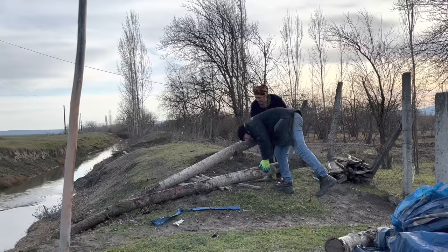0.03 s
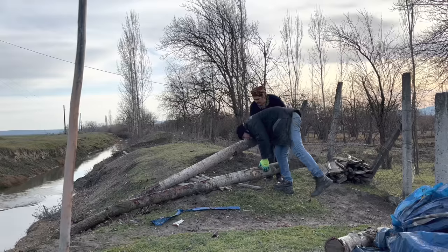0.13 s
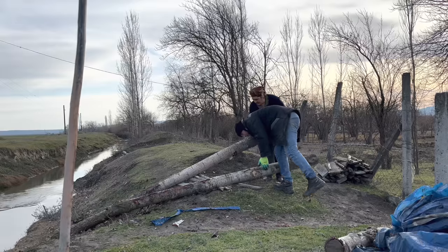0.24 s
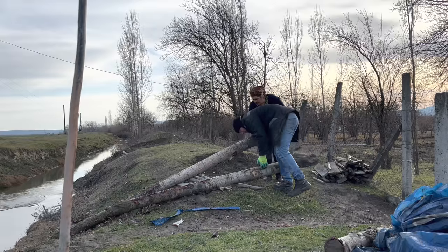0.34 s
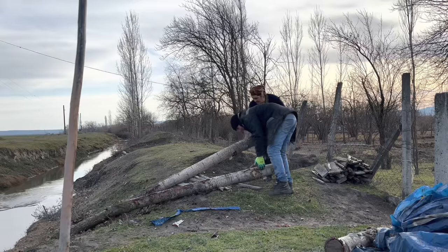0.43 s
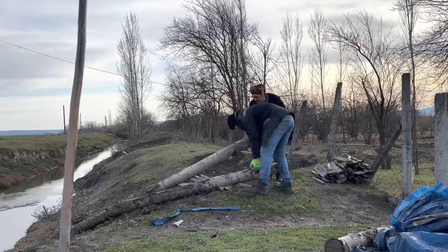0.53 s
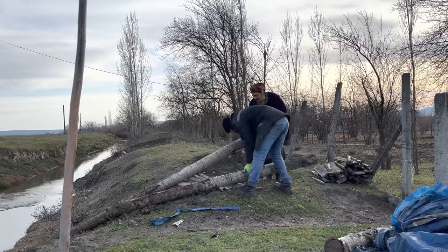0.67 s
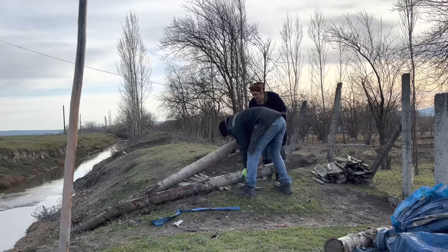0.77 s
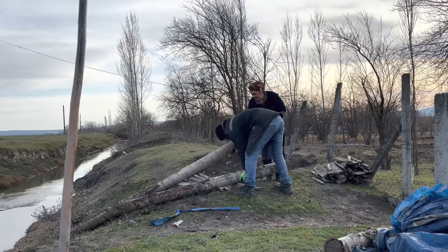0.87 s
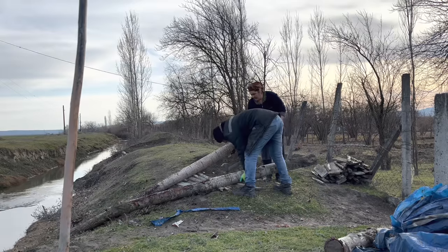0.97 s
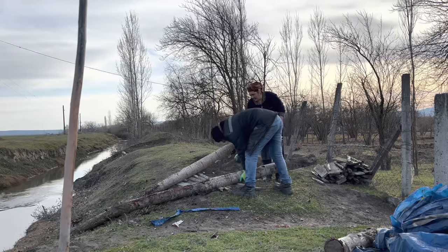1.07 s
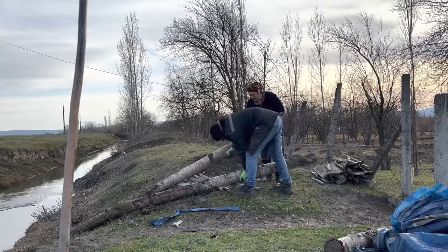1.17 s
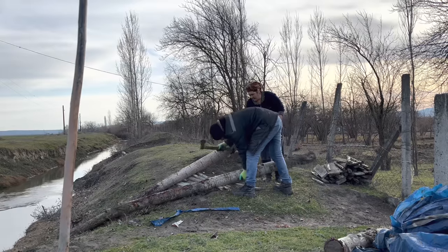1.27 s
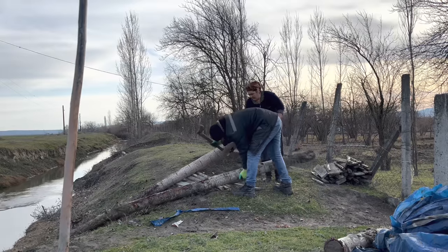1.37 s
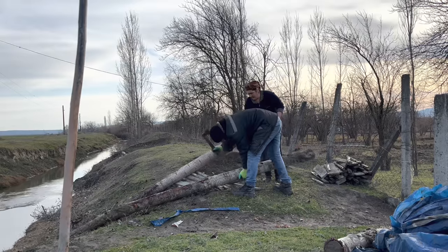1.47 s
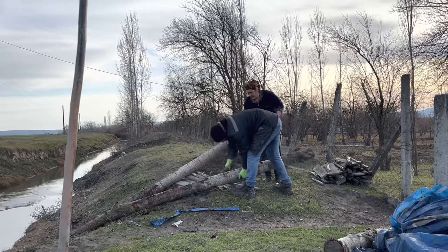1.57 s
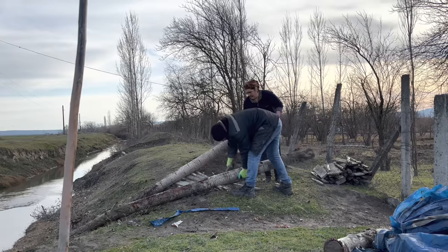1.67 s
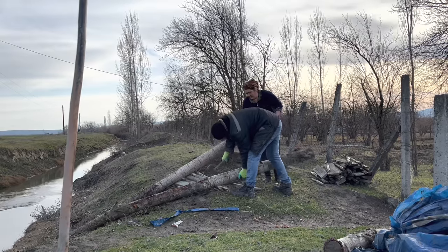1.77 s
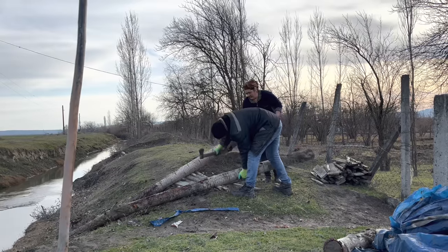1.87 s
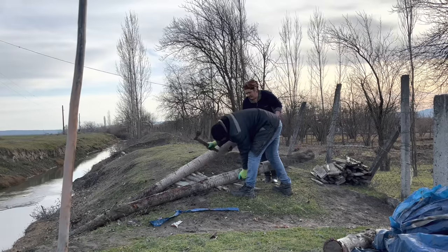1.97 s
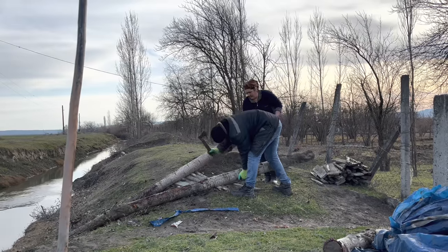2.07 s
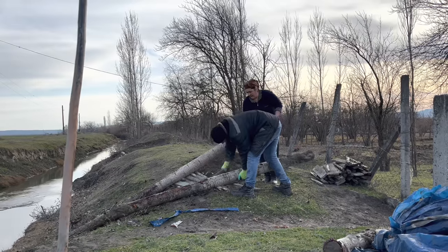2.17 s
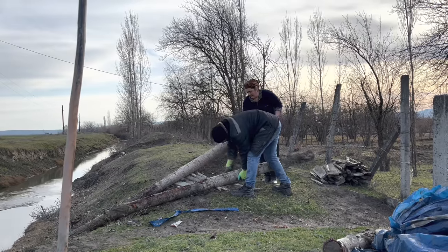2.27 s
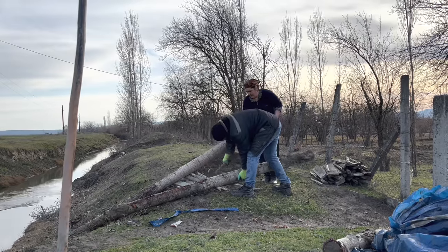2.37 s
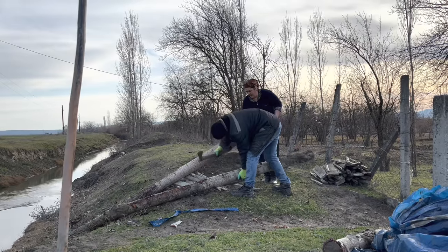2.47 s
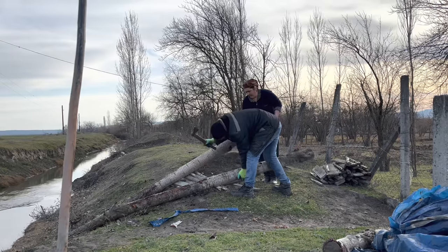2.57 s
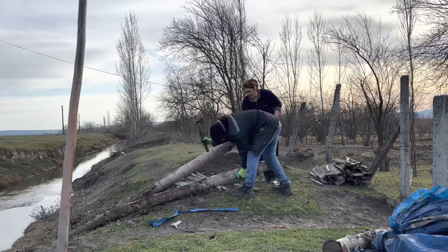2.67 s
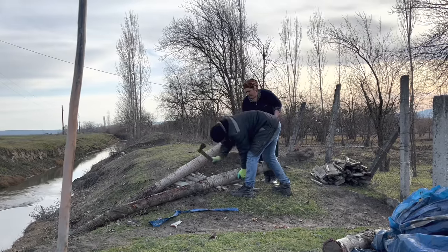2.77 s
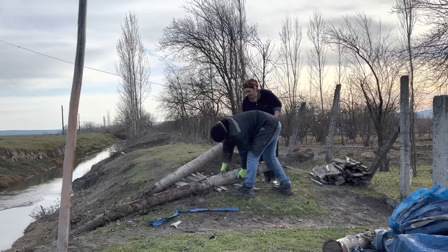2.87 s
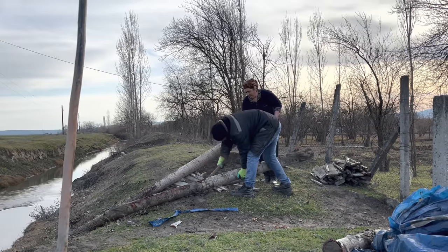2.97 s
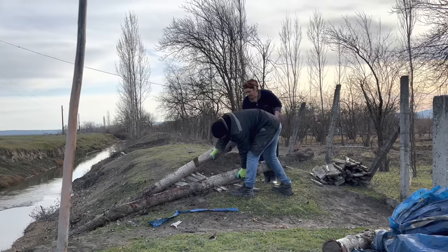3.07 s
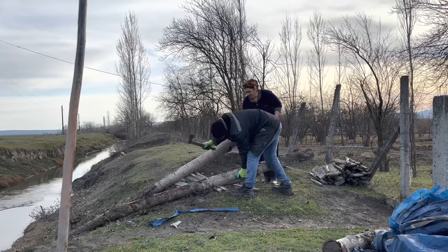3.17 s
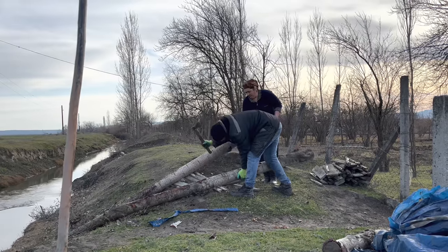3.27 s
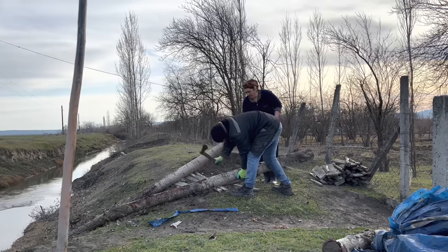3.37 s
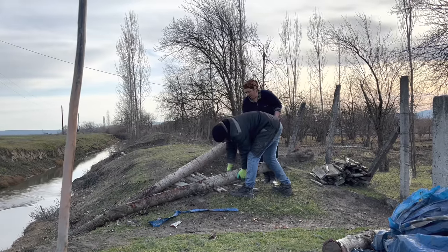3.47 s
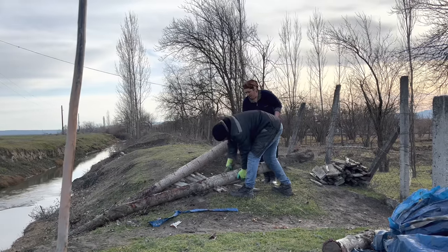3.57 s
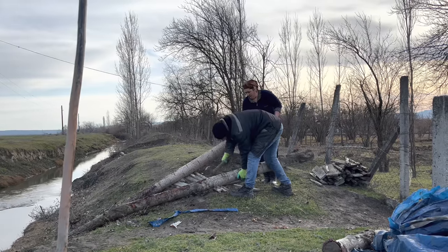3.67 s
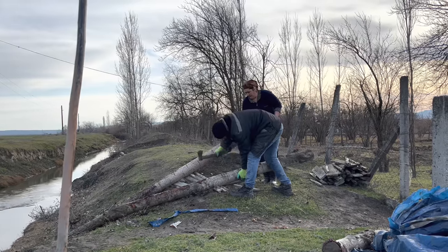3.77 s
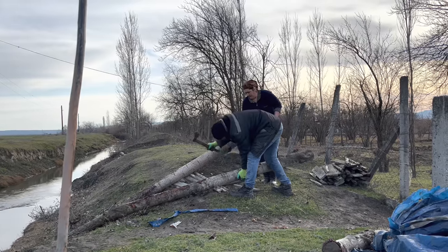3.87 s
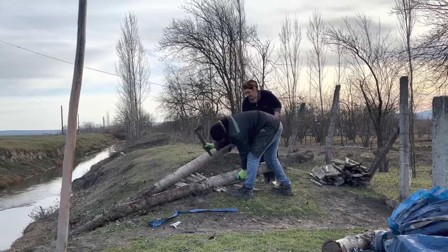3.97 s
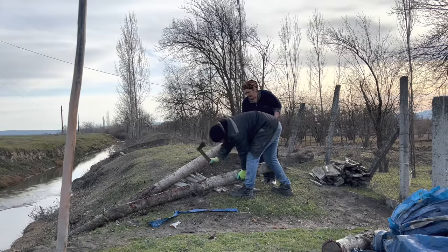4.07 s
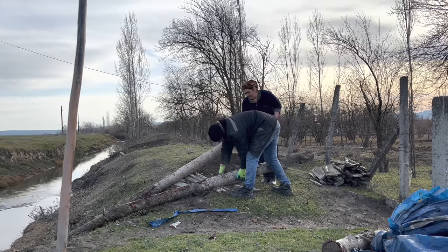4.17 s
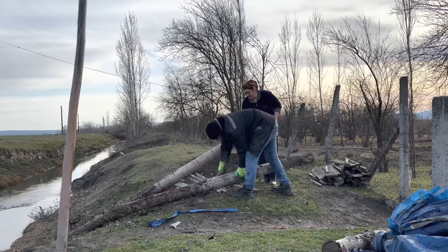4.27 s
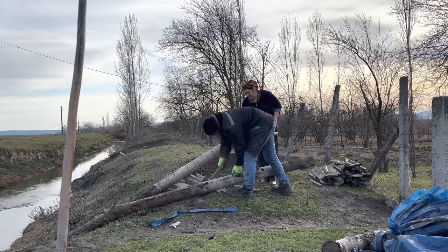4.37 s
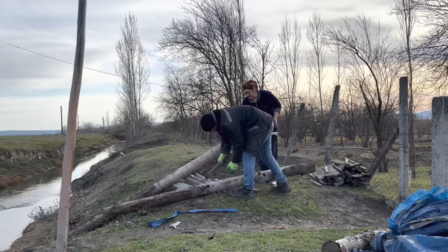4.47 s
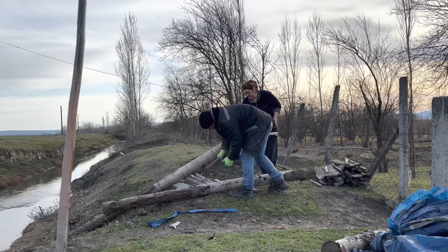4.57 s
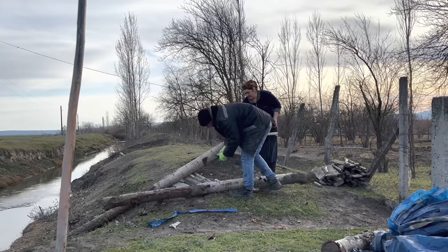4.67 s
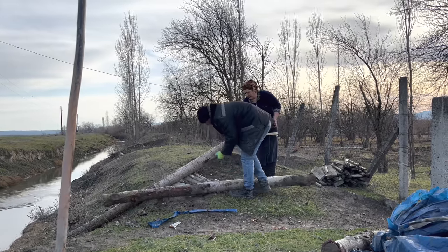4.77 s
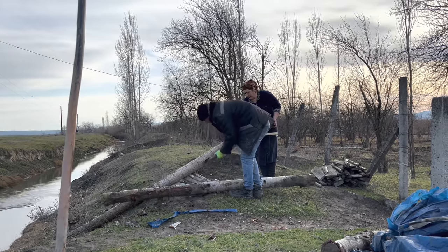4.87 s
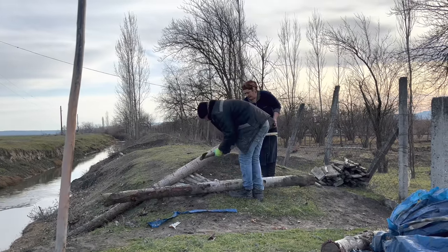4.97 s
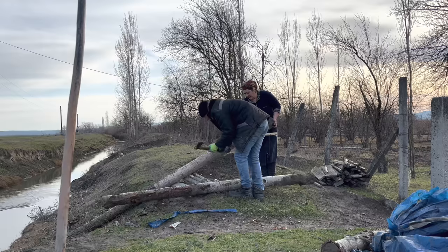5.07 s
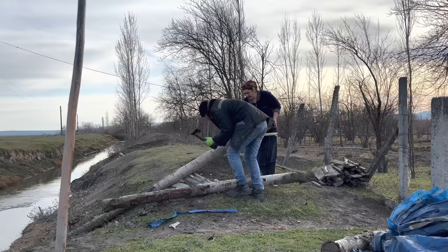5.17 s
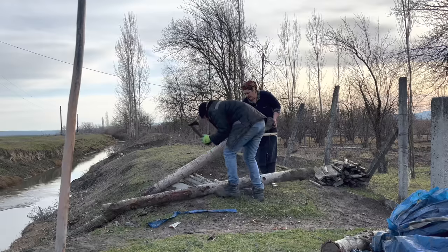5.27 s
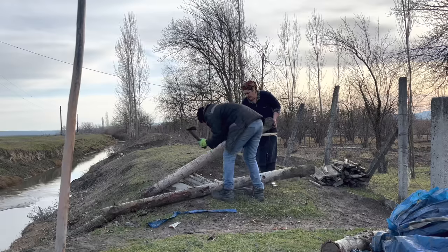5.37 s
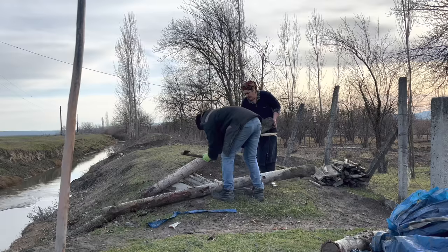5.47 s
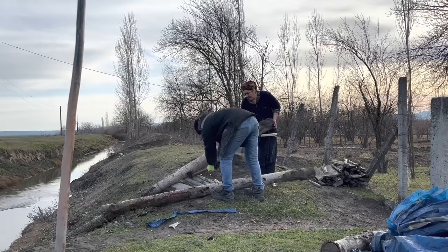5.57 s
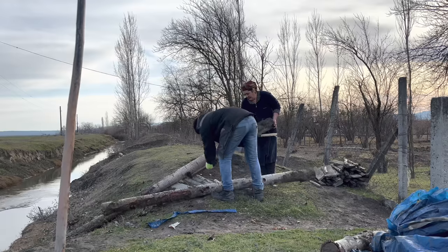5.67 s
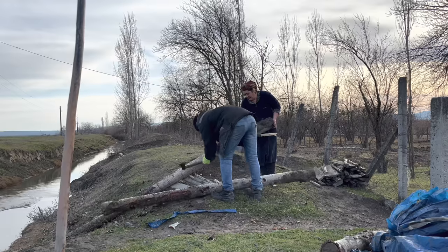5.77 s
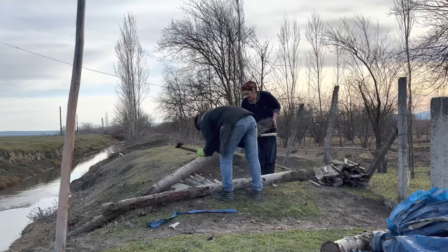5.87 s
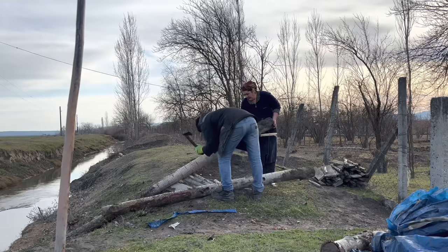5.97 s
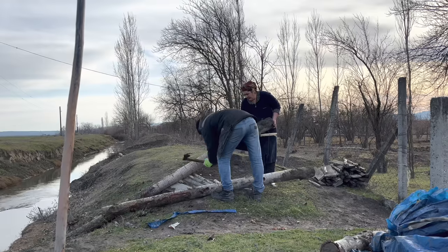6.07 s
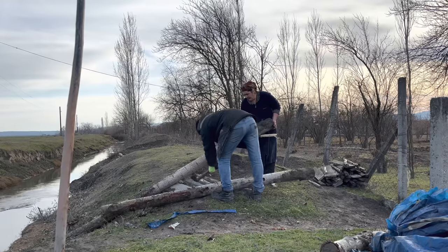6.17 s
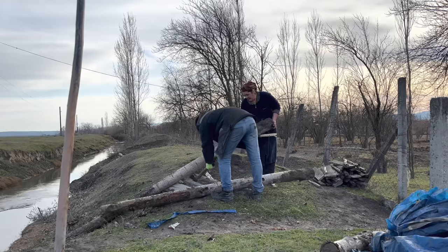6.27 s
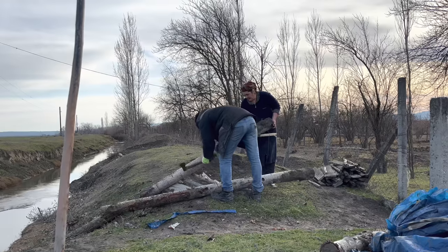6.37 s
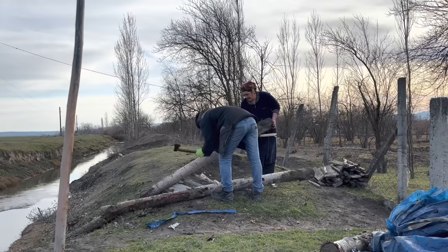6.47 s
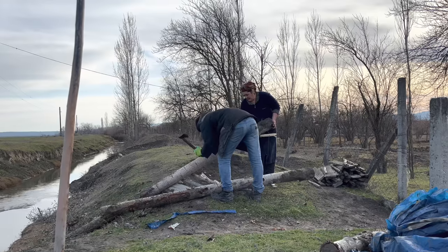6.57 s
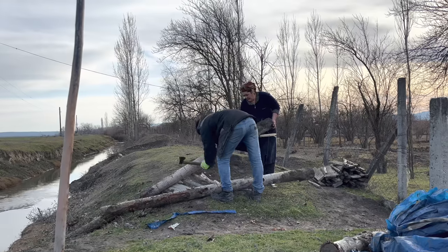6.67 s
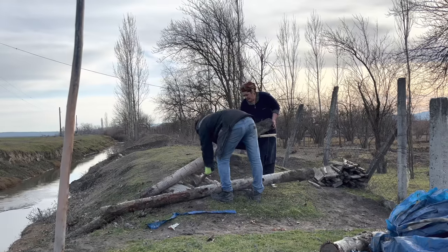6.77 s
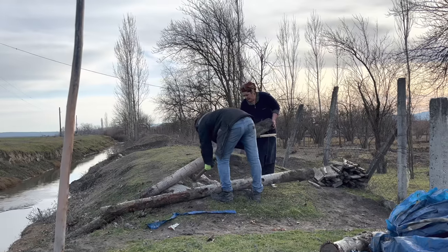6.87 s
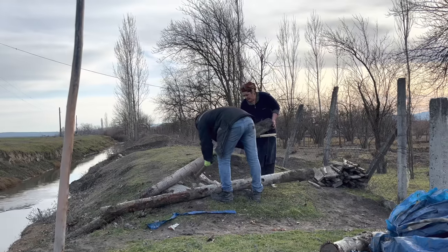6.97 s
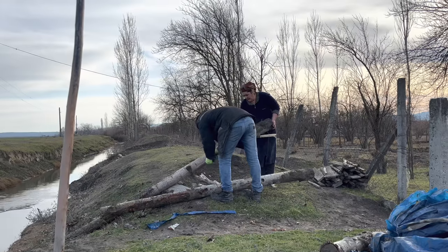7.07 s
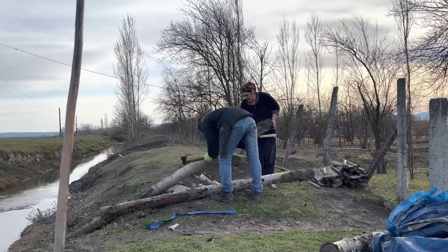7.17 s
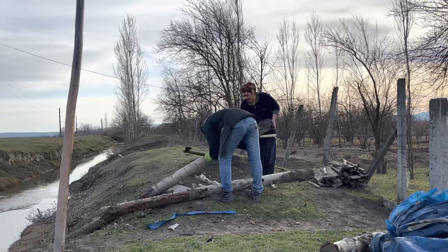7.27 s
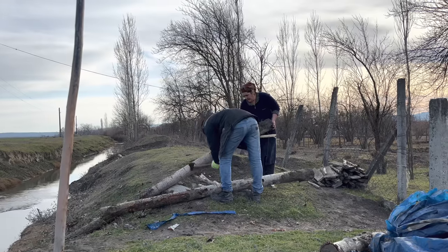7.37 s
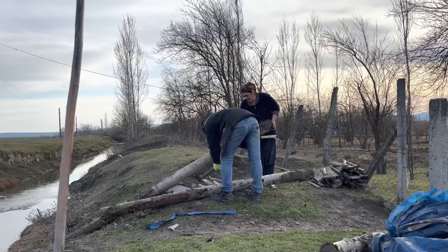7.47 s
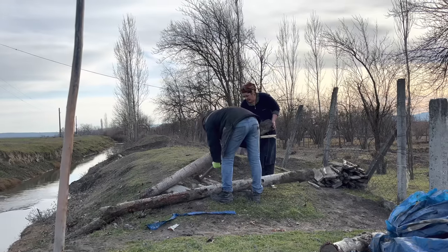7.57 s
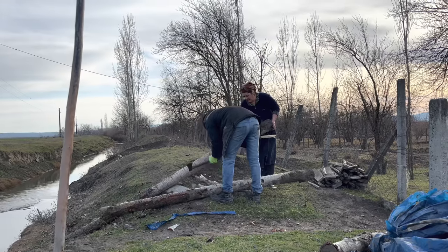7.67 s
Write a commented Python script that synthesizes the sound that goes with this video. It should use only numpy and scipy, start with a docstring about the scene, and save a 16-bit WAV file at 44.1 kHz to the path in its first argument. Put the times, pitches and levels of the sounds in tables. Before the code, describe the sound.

Outdoors on an open bank, soft rustling of boots and bark in dry grass leads into nine axe blows on a fallen trunk a few metres away. Each is a short fibrous crack with a dull, damped wooden knock and a faint diffuse tail from bare trees. After five hits comes a longer pause, filled by rustling and a low wind gust thumping the microphone, then four more hits.

```python
"""On an open river bank, boots and bark rustle in dry grass near the microphone as wind passes it.
From 1.6 s on, nine axe blows cut into a fallen trunk a few metres away: each is a burst of breaking fibres,
then four damped wood resonances. The handle rings, chips tick, and bare trees return a diffuse tail.
Midway a long gust rumbles and flutters as shaped noise, and eddies thump the microphone as short low swings.
The blows carry on to the last at 7.4 s, over more rustling and the faint hush of the field."""
import sys
import numpy as np
from scipy import signal
from scipy.fft import rfft, irfft, next_fast_len
from scipy.io import wavfile
from scipy.ndimage import uniform_filter1d

SR = 44100
rng = np.random.default_rng(int(sys.argv[2]) if len(sys.argv) > 2 else 0)


def digitize_waveform(pressure):
    """Quantize a signal to 16-bit integers and store it at the path in sys.argv[1].

    Rows of a 2-D input are taken as channels; values are limited to [-1, 1].
    """
    field = np.atleast_2d(pressure).T
    bounded = np.clip(field, -1, 1)
    quanta = np.round(bounded * 32767).astype(np.int16)
    wavfile.write(sys.argv[1], SR, quanta)


N = 340452
TIME = np.arange(N) / SR  # seconds
SHORT = TIME[:SR // 3]  # time axis of one contact

# Axe blows on the trunk. Each row: start in seconds, then thud, knock, clack and snap resonances, each as
# frequency in Hz and gain in dB, then fibre crack gain in dB, gain of the diffuse tail in dB.
BLOWS = [(1.5706, 296, 33.5, 647, 31.5, 1250, 13, 1910, 15, -1.5, -5),
         (2.172, 286, 38.5, 494, 29.5, 1000, 24, 1670, 20, -4, -8),
         (2.8167, 298, 33, 640, 31.5, 1028, 25, 2056, 19, 4, -4.5),
         (3.4177, 292, 34, 617, 32.5, 1070, 28.5, 2217, 25.5, 0, -3.5),
         (4.1365, 310, 34.5, 688, 35.5, 1186, 30, 1984, 21.5, -3, -1.5),
         (5.5212, 334.5, 34.5, 567, 30, 838, 32.5, 1790, 25, 1.5, -2.5),
         (6.1040, 336, 34, 573, 32, 1104, 28, 1908, 25.5, 2, 1),
         (6.7010, 413, 34.5, 860, 30, 1340, 19, 1950, 23.5, 1.5, 0.5),
         (7.3882, 376, 32.5, 528, 28.5, 1080, 20.5, 1760, 21.5, -1, -5.5)]
# Rebounds of the blade, flying chips and cracking bark; all get a common boost in chips().
# Each row: start in seconds, relative level in dB of body, of clack, of tick.
CHIPS = [(1.592, -22.5, -26.5, -51), (1.702, -64, -65, -67), (2.005, -68, -79, -55.5),
         (2.244, -42, -63, -65), (3.44, -45, -45, -45), (3.471, -45, -46, -54.5), (3.503, -43, -57, -71),
         (4.389, -64, -54, -70), (4.445, -56, -58, -70), (4.691, -70, -56.5, -63.5), (4.777, -73, -80, -56),
         (6.755, -24, -35.5, -76), (6.860, -62, -50.5, -46.5), (6.890, -40.5, -57, -60),
         (7.46, -30.5, -42, -54), (7.511, -43.5, -57, -76.5)]
# Off-centre hits and wrenching the blade free. Each row: start in seconds, level in dB.
HANDLE_JOLTS = [(1.594, -28), (1.702, -36), (2.245, -43), (3.422, -26), (3.504, -36), (4.14, -17)]
# Bending modes of the wooden handle. Each row: frequency in Hz, relative level in dB, 60 dB decay in seconds.
HANDLE_MODES = [(231, -7, .2), (689, 0, .15), (1265, -16, .07), (1905, -18, .07)]
# Glancing contacts of the steel head. Each row: start in seconds, level in dB.
GLANCES = [(6.859, -48), (6.955, -62), (6.982, -56), (7.392, -41.5)]
# Modes of the steel head. Each row: frequency in Hz, relative level in dB, 60 dB decay in seconds.
STEEL_MODES = [(4050, -1, 0.05), (6260, -6.5, 0.13), (12300, -12, 0.097)]
# Colour of breaking fibres. Each row: frequency in Hz, gain in dB.
FIBRE_COLOUR = [(40, -3), (160, 23.5), (600, 16.5), (1300, 18), (2500, 12.5), (4000, 7.5), (6000, 0.5),
                (9000, -3), (11000, -3), (13500, -6.5), (16000, -13)]
# Scatter from the ground near the trunk. Each row: frequency in Hz, gain in dB, 60 dB decay in seconds.
GROUND_SCATTER = [(104, 2, 0.24), (313, -11.5, .16), (1000, -7, 0.05), (3000, -8.5, 0.067),
                  (12000, -15, 0.025)]
# Colour and decay of the long diffuse tail, with a narrow gap near 8.2 kHz.
# Each row: frequency in Hz, gain in dB, 60 dB decay in seconds.
DIFFUSE_TAIL = [(60, -2.5, 0.31), (262, 7.5, 1), (710, 10.5, 0.19), (2000, -7.5, .6), (3780, -19.5, 0.59),
                (7250, -17, 0.27), (8154, -32, 0.1), (10100, -17.5, 0.29), (13500, -23, 0.24),
                (16000, -42.5, .2)]
# The two microphone ports, as heard from the trunk.
# Each row: frequency in Hz, phase by which left leads right in radians, left minus right level in dB.
PORTS = [(0, 0, 0), (250, 0, 1), (2200, .2, .7), (3300, 1, 2), (4700, .6, 3), (6000, -.8, 1.5),
         (7000, -1.1, .5), (8400, -3.1, 0), (11000, -5.6, 0), (15000, -9, 0)]
# Boots and bark dragged through dry grass.
# Each row: fastest moment in seconds, nominal length in seconds, scrape level in dB, hiss level in dB.
RUSTLES = [(0.02, 0.59, -67.5, -79.5), (0.581, 0.11, -74, -67.5), (.74, 0.33, -66.5, -75.5),
           (1.985, .12, -77, -67), (3.768, .45, -72.5, -90), (4.377, 0.22, -60.5, -73.5),
           (4.566, 0.34, -69, -71.5), (4.775, 0.18, -66, -71), (5.2, 0.25, -70, -70),
           (5.31, 0.075, -72, -64), (5.8, 0.3, -76.5, -82), (6.44, 0.23, -74, -84.5),
           (6.96, 0.098, -68, -69), (7.703, 0.14, -85, -80)]
# Colour of scraped bark. Each row: frequency in Hz, relative gain in dB.
SCRAPE_COLOUR = [(200, -9.5), (700, 1), (1700, -2), (3000, -7), (5000, -15), (9000, -37.5)]
# Colour of the bright rustling hiss, with a narrow gap near 8.4 kHz.
# Each row: frequency in Hz, relative gain in dB.
HISS_COLOUR = [(1000, -21.5), (3000, 1), (4500, 0.5), (7200, 2), (8400, -42), (9800, 3), (13500, -1),
               (16000, -33.5)]
# Single eddies at the microphone; all get a common boost in buffets().
# Each row: start in seconds, relative level in dB, frequency in Hz.
BUFFETS = [(0.033, -32, 86), (0.676, -19, 71), (0.829, -27, 71.4), (0.972, -24.5, 74.6), (2.546, -24, 80.3),
           (2.97, -17, 82), (3.083, -21, 66), (3.535, -14.5, 110.8), (3.714, -19, 94.6), (3.805, -16, 84),
           (4.835, -15.5, 79.5), (4.981, -18, 119), (5.035, -13, 82.5), (5.266, -18.5, 103.4),
           (7.169, -22.5, 77.7), (7.408, -15.5, 72.5), (7.563, -22.5, 105), (7.647, -22, 82.1)]
# Wind at the microphone, one long gust in the middle. Each row: time in seconds, strength in dB.
WIND_STRENGTH = [(0.0, -54.5), (0.52, -61), (0.79, -50), (1.48, -57), (1.74, -49.5), (2.26, -54.5),
                 (3.14, -39), (3.35, -43), (4.34, -31), (4.69, -39), (5.12, -32), (5.27, -41),
                 (5.87, -49.5), (6.21, -48), (6.52, -53.5), (7.12, -49.5), (7.31, -46), (7.72, -40)]
# Colour of the wind rumble. Each row: frequency in Hz, relative gain in dB.
RUMBLE_COLOUR = [(20, -21), (40, -0.5), (60, 6.5), (95, 3), (135, -4), (200, -29.5), (400, -76.5)]
# Colour of the higher wind flutter. Each row: frequency in Hz, relative gain in dB.
FLUTTER_COLOUR = [(70, -17.5), (150, 1.5), (220, -5.5), (320, -19), (600, -43.5), (1500, -66.5)]
# Colour of the open field's hush. Each row: frequency in Hz, relative gain in dB.
AIR_COLOUR = [(100, -6), (300, 1), (500, 5.5), (1000, -6.5), (1600, -14), (3000, -27), (6000, -27.5),
              (8500, -35.5), (11000, -28), (16000, -39)]

# every blow shakes the handle a little, this long after its start
BLOW_JOLT_DB, JOLT_DELAY_S = -32.5, .003
# sleeves swish as the axe comes down before each blow
SWING_LEAD_S, SWING_S, SWING_SCRAPE_DB, SWING_HISS_DB = .05, 0.25, -76.5, -81.5
# a movement swells for this share of its nominal length, and is this much fainter at both its ends
RISE_SHARE, ENDS_DB, ROUNDNESS = .42, -13, 1.2
RUMBLE_DB = 3.5  # rumble above the wind's strength
# at a moderate breeze's strength the flutter has this level, and it grows with the wind
BREEZE_DB, FLUTTER_DB, FLUTTER_DB_PER_DB = -45, -52.5, 0.99
AIR_DB = -64
# the microphone has a narrow dip in the middle range, and an upper band limit
DIP_HZ, DIP_WIDTH_HZ, DIP_DEPTH = 1593, 93, .85
EDGE_HZ = 16300


def amp(db):
    """Decibels to gain."""
    return 10 ** (np.asarray(db) / 20)


def unit(x):
    """Scales to rms 1."""
    return x / np.sqrt(np.mean(x ** 2) + 1e-20)


def read(points, hz, axis=1):
    """One column of a table, joined on a log-frequency axis."""
    columns = np.transpose(points)
    return np.interp(np.log(hz + 1), np.log(columns[0] + 1), columns[axis])


def add(mix, s, sound):
    """Adds a sound to the mix at a time in seconds."""
    part = mix[..., max(round(s * SR), 0):][..., :sound.shape[-1]]
    part += sound[..., :part.shape[-1]]


def chops():
    """The edge breaks the fibres first; the deeper resonances swell as the trunk stops the head."""
    out = np.zeros((2, N))
    for s, thud_hz, thud_db, knock_hz, knock_db, clack_hz, clack_db, snap_hz, snap_db, crack_db, _ in BLOWS:
        blow = amp(crack_db) * colour(fracture(rise=0.002, grain=0.73), FIBRE_COLOUR)
        add(blow, 0, amp(snap_db) * knock(snap_hz, rise=.0016))
        add(blow, .0003, amp(clack_db) * knock(clack_hz, rise=0.002))
        add(blow, .0011, amp(knock_db) * knock(knock_hz, rise=.0019))
        add(blow, .0024, amp(thud_db) * knock(thud_hz, rise=0.0022))
        add(out, s, grounded(blow))
    return out


def swell(rise):
    """A push that peaks after the rise time in seconds and dies away smoothly."""
    return (SHORT / rise) ** 2 * np.exp(-2 * SHORT / rise)


def fracture(rise, grain):
    """A few milliseconds of fibres snapping, as noise of energy 1; grain makes single snaps stand out."""
    sign, size = rng.standard_normal((2, len(SHORT)))
    burst = swell(rise) * sign * np.exp(grain * size)
    return burst / np.linalg.norm(burst)


def knock(hz, rise):
    """A heavily damped resonance of green wood, with a gain of about 1 at its frequency."""
    push = swell(rise)
    return 2 * push / push.sum() * np.sin(2 * np.pi * hz * (SHORT - rise))


def colour(x, points, size=4096):
    """Causal filter with the given spectrum: nothing sounds before a click."""
    log_gain = np.log(amp(read(points, abs(np.fft.fftfreq(size, 1 / SR)))))
    minimum_phase = np.exp(signal.hilbert(log_gain).conj())
    taps = np.fft.ifft(minimum_phase).real[:size // 2]
    return signal.oaconvolve(x, taps)[:len(x)]


def chips(burst_db=26):
    """Lighter contacts: one short fracture in three bands, whose balance makes each dull or bright."""
    out = np.zeros((2, N))
    for s, body_db, clack_db, tick_db in CHIPS:
        burst = fracture(rise=.002, grain=0.19)
        chip = amp(body_db) * band(band(burst, 250, 900), 200, 1400)
        chip += amp(clack_db) * band(band(burst, 1200, 3200), 900, 4500)
        chip += amp(tick_db) * band(burst, 3500, 14000)
        add(out, s, grounded(amp(burst_db) * chip))
    return out


def band(x, lo_hz, hi_hz):
    """Causal band-pass, scaled to energy 1."""
    part = signal.sosfilt(signal.butter(2, [lo_hz, hi_hz], "band", fs=SR, output="sos"), x)
    return part / np.linalg.norm(part)


def handle():
    """A jolted handle rings on in its bending modes with a hollow tock."""
    out = np.zeros((2, N))
    blow_jolts = [(s + JOLT_DELAY_S, BLOW_JOLT_DB) for s, *_ in BLOWS]
    for s, db in HANDLE_JOLTS + blow_jolts:
        add(out, s, grounded(amp(db) * ring(HANDLE_MODES)))
    return out


def steel():
    """The head tings faintly in its own modes as it glances off the cut."""
    out = np.zeros(N)
    for s, db in GLANCES:
        add(out, s, amp(db) * ring(STEEL_MODES))
    return out


def ring(modes):
    """The free ring of a struck part: sines that decay exponentially."""
    return sum(amp(db - 60 * SHORT / t60) * np.sin(2 * np.pi * hz * SHORT) for hz, db, t60 in modes)


def grounded(sound):
    """A sound with its scatter off the nearby ground, drawn anew for each contact."""
    echoes = scatter(GROUND_SCATTER, start=.0025, side_db=0, mono_hz=350, size=len(sound))
    return sound + signal.fftconvolve(sound[None], echoes, axes=1)[:, :len(sound)]


def scatter(table, start, side_db, mono_hz, size, patchy_db=4.5):
    """Many small echoes in uneven clusters, each band dying at its own speed; the bass is alike at both ports."""
    fade_in = np.clip(TIME[:size] / start - 1, 0, 1)  # silent until the first echo can arrive
    taps = rng.standard_normal((2, size)) * fade_in
    hz, at, z = signal.stft(taps, SR, nperseg=256)
    patches = uniform_filter1d(rng.standard_normal(z.shape[1:]), size=8, axis=1)
    patches = unit(uniform_filter1d(patches, size=4, axis=0))
    t60 = read(table, hz, axis=2)[:, None]
    clusters_db = patchy_db * patches * at / (at + 0.01)  # late echoes are more uneven
    decay = amp(read(table, hz)[:, None] + clusters_db - 60 * at / t60)
    z = z * decay * np.sqrt(2 * np.log(1000) / (t60 * SR))  # a long decay carries no extra energy
    z[1] *= (amp(side_db) * hz / (hz + mono_hz))[:, None]
    mid, side = signal.istft(z, SR, nperseg=256)[1][:, :size]
    return np.array([mid + side, mid - side])


def ports(x):
    """Sound from the trunk reaches the two ports at slightly different times and levels."""
    hz = np.fft.rfftfreq(N, 1 / SR)
    lean = amp(read(PORTS, hz, axis=2) / 2)  # half the level difference on each side
    turn = np.exp(-1j * read(PORTS, hz))
    return irfft(rfft(x) * np.array([lean, turn / lean]), N)


def trees():
    """Each blow comes back from the bare trees as a faint, diffuse wash."""
    out = np.zeros((2, N))
    for s, *_, tail_db in BLOWS:
        wash = scatter(DIFFUSE_TAIL, start=0.0061, side_db=-1.0, mono_hz=300, size=SR)
        add(out, s, amp(tail_db) * wash)
    return out


def rustle(clump_db=3):
    """Bark scrapes and a bright hiss crackle in small clumps; sleeves swish with each swing."""
    swings = [(s - SWING_LEAD_S, SWING_S, SWING_SCRAPE_DB, SWING_HISS_DB) for s, *_ in BLOWS]
    scrape_gain, hiss_gain = np.zeros((2, N))
    for s, length, scrape_db, hiss_db in RUSTLES + swings:
        moving = movement(s, length)
        scrape_gain += amp(scrape_db) * moving
        hiss_gain += amp(hiss_db) * moving
    clumps = unit(amp(clump_db * unit(uniform_filter1d(rng.standard_normal(N), size=500))))
    bark = mottled(noise(SCRAPE_COLOUR, side_db=-19.5, grain=0.52), depth_db=4.0, size=16)
    hiss = noise(HISS_COLOUR, side_db=-3.0, grain=0.76)
    return clumps * (scrape_gain * bark + hiss_gain * hiss)


def movement(s, length):
    """Gain of a movement that gathers speed, is fastest at s, and slows down."""
    t = TIME[::64]
    away = np.maximum((s - t) / RISE_SHARE, (t - s) / (1 - RISE_SHARE)) / length  # 1 at either end
    return np.interp(TIME, t, amp(ENDS_DB * np.minimum(away, 10) ** ROUNDNESS))


def buffets(level_db=12, rise=0.0091):
    """A strong eddy is one short swing of pressure."""
    out = np.zeros(N)
    for s, db, hz in BUFFETS:
        add(out, s, amp(db + level_db) * swell(rise) * np.sin(2 * np.pi * hz * SHORT))
    return out


def wind(lumps_db=2.5, lumps_per_s=22):
    """Eddies pass the microphone in lumps; stronger gusts add a higher flutter."""
    at = np.arange(400) / lumps_per_s
    lumps = unit(amp(lumps_db * np.interp(TIME, at, rng.standard_normal(len(at)))))
    gust_db = np.interp(TIME, *np.transpose(WIND_STRENGTH))
    flutter_db = FLUTTER_DB + FLUTTER_DB_PER_DB * (gust_db - BREEZE_DB)
    rumble = amp(gust_db + RUMBLE_DB) * noise(RUMBLE_COLOUR, side_db=-12.5)
    flutter = amp(flutter_db) * noise(FLUTTER_COLOUR, side_db=-11.5)
    return lumps * (rumble + flutter)


def field():
    """The faint, wide hush of open country: noise that slowly changes colour."""
    return amp(AIR_DB) * mottled(noise(AIR_COLOUR, side_db=2.5), depth_db=2.5, size=24)


def noise(points, side_db, grain=0.):
    """Stereo noise of a given spectrum, its middle of rms 1; grain makes single crackles stand out."""
    size = next_fast_len(N, real=True)
    white = rng.standard_normal((2, N)) * np.exp(grain * rng.standard_normal(N))
    gain = amp(read(points, np.fft.rfftfreq(size, 1 / SR)))
    mid, side = irfft(rfft(white, size) * gain, size)[:, :N]
    return unit(mid) + amp(side_db) * unit(side) * np.array([[1], [-1]])


def mottled(x, depth_db, size):
    """Lets the colour of a sound drift in random patches, about 200 Hz wide and `size` frames long."""
    z = signal.stft(x, nperseg=1024, noverlap=768)[2]
    patches = uniform_filter1d(rng.standard_normal(z.shape[1:]), size=size, axis=1)
    patches = unit(uniform_filter1d(patches, size=5, axis=0))
    return unit(signal.istft(z * amp(depth_db * patches), nperseg=1024, noverlap=768)[1][:, :N])


def scene():
    """The axe work with its diffuse tail, over rustling and wind."""
    axe = ports(chops() + chips() + handle() + steel())
    return axe + trees() + rustle() + buffets() + wind() + field()


def dipped(x):
    """Weakens a narrow band by subtracting most of its resonance."""
    peak = signal.iirpeak(DIP_HZ, DIP_HZ / DIP_WIDTH_HZ, fs=SR)
    return x - DIP_DEPTH * signal.lfilter(*peak, x)


def record(dry, low_cut_hz=32):
    """The microphone's dip, a deep bass cut, rounding of the loudest peaks, then the band limit."""
    lean = signal.sosfilt(signal.butter(2, low_cut_hz, "high", fs=SR, output="sos"), dipped(dry))
    rounded = lean / (1 + (lean / .93) ** 6) ** (1 / 6)  # peaks stay below .93
    low_pass = signal.firwin(511, EDGE_HZ, window=("kaiser", 9), fs=SR)
    return signal.oaconvolve(rounded, low_pass[None], "same")


dry = scene()
out = record(dry)
digitize_waveform(out)
```